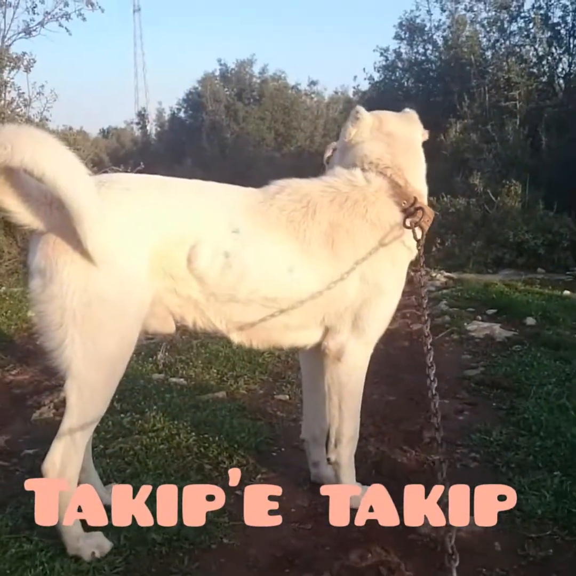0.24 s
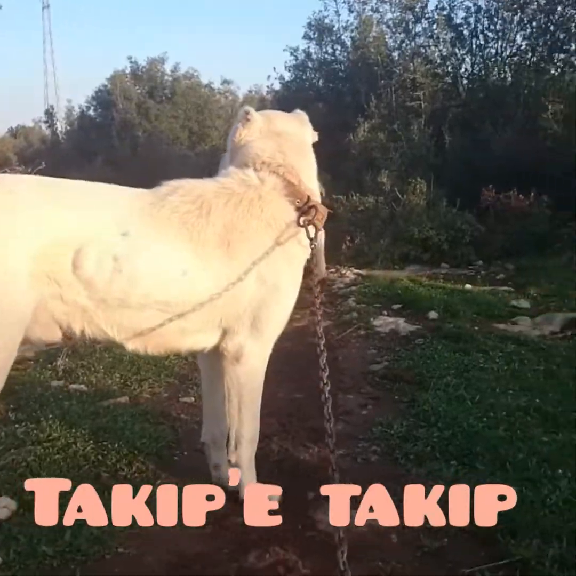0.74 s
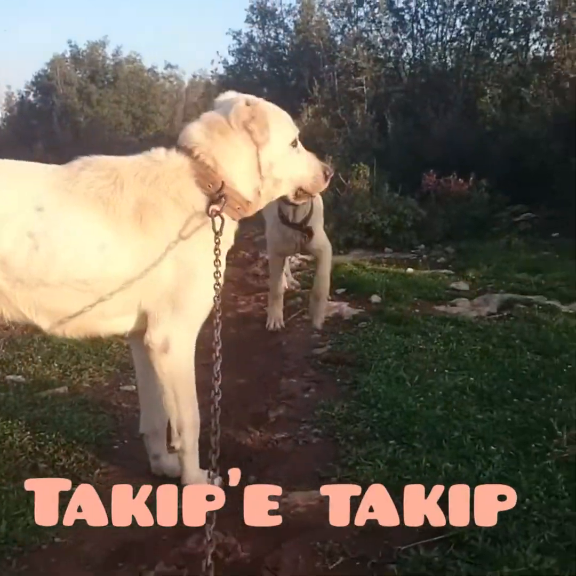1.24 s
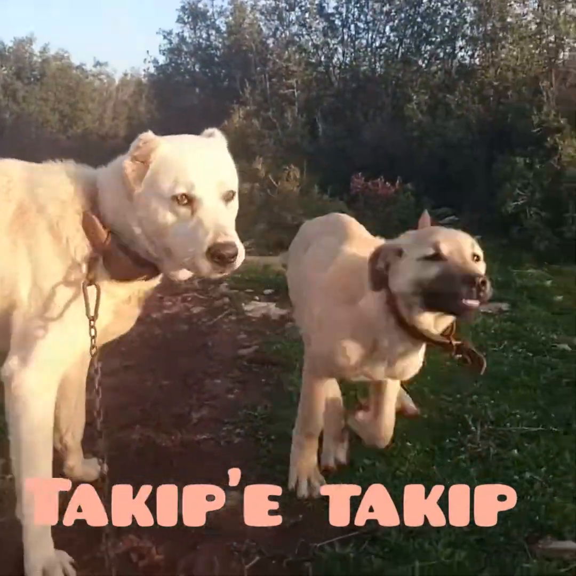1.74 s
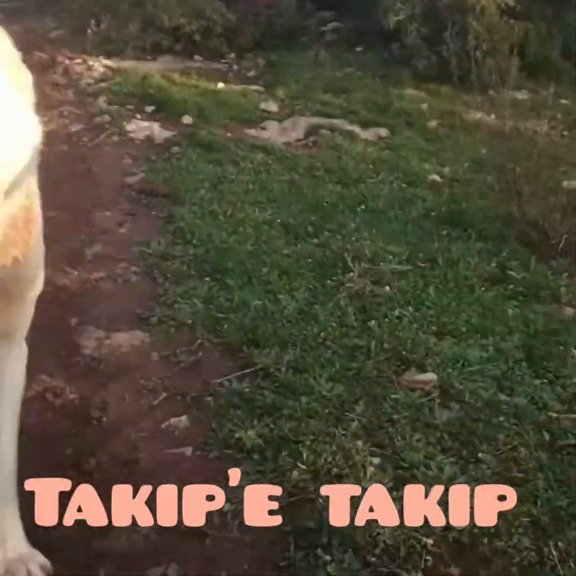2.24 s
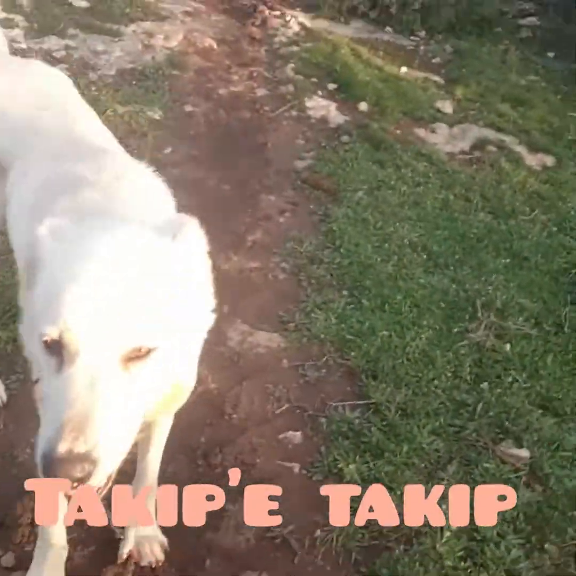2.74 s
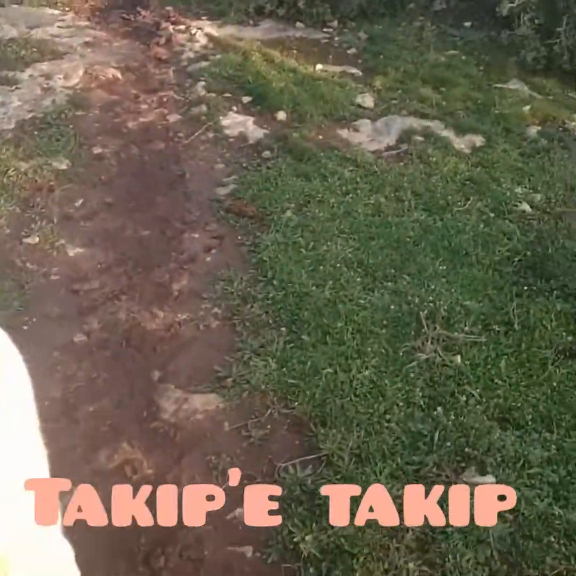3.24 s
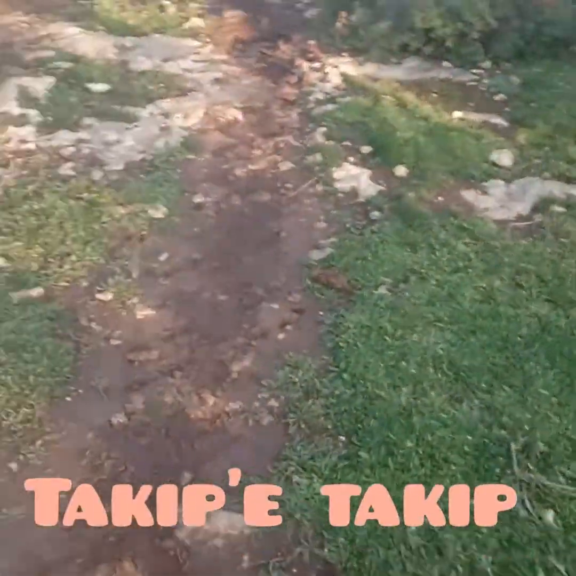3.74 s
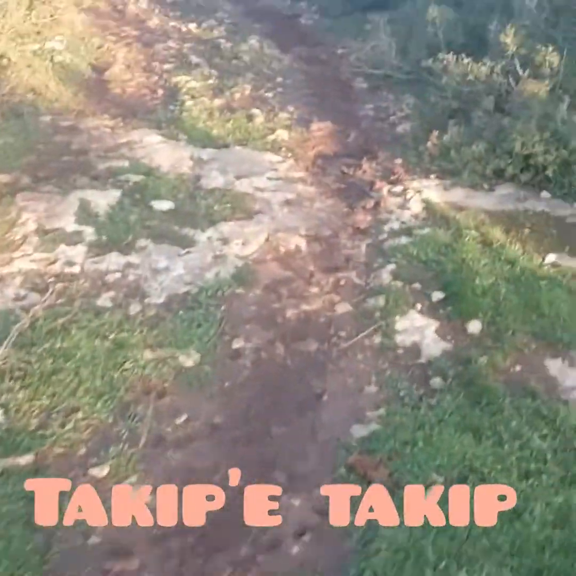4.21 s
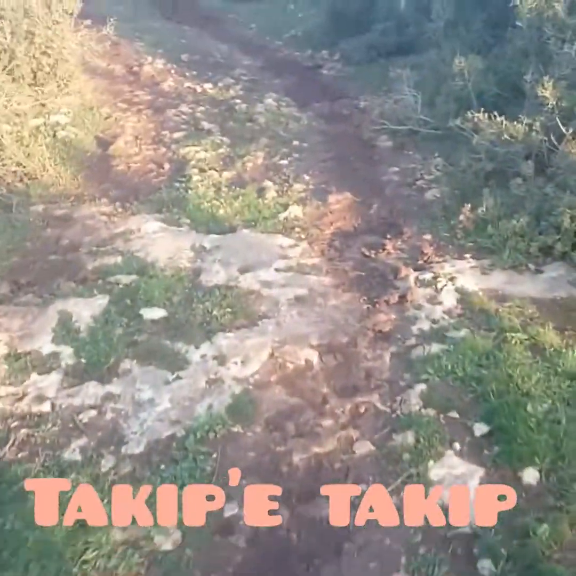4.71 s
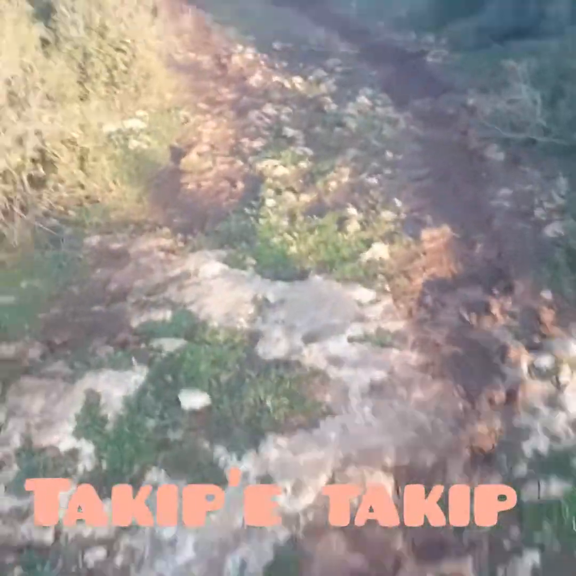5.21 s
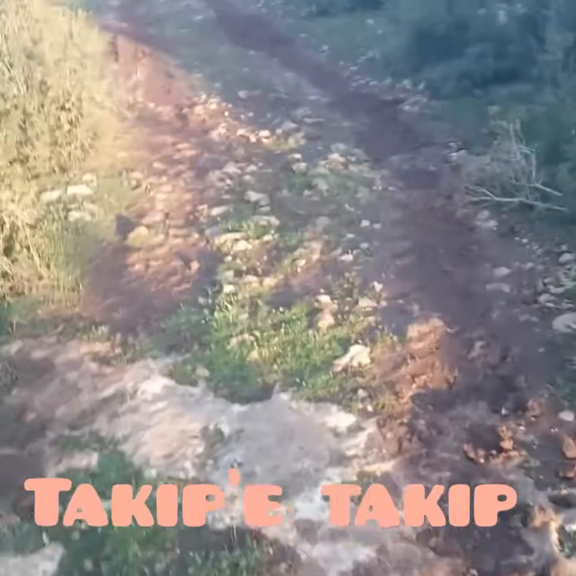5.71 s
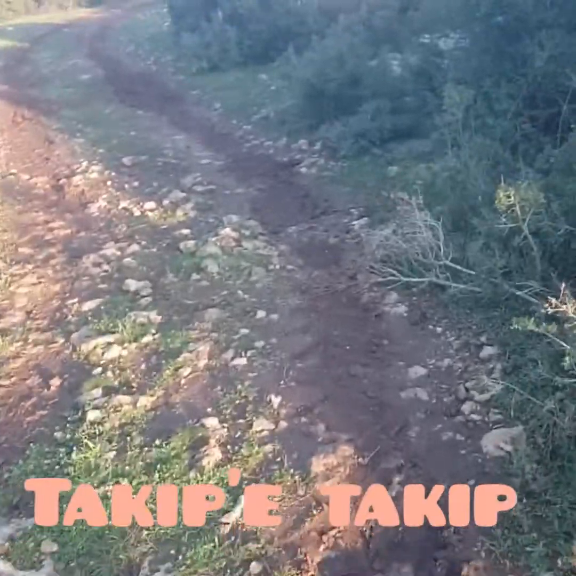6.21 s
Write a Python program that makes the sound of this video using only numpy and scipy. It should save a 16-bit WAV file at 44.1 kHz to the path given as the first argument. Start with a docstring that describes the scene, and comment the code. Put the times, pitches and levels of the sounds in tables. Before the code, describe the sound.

Outdoors on a dirt path, a quiet low rumble and a few soft bumps on the phone come first. After two seconds a chain jerks close by: dry, bright clicks in bursts, then pauses, then harder snaps and blunt clacks, hardest after five seconds. Far traffic stays faint behind. Close handheld phone, dry, no echo.

```python
"""Chained dog passing a phone

Clusters of dry, sharp clicks, as of chain links jerking close by: short snaps that ring the microphone port.
Blunter clacks are damped modes; links shimmer as decaying sines and grind as random slips.
Faint tonal flickers are detuned sine bursts; grit scuffs in tiny grains.
Low bumps and rubs on the phone are swells of tone and filtered noise.
Behind: shaped noise and wavering tones for rumble, far engine, traffic and hiss, and one bird whistle."""
import sys
import numpy as np
from scipy import signal
from scipy.fft import rfft, irfft
from scipy.io import wavfile
from scipy.ndimage import uniform_filter1d

SR = 44100
rng = np.random.default_rng(int(sys.argv[2]) if len(sys.argv) > 2 else 0)


def master_out(mix):
    """Clip the mix to full scale and print it as 16-bit PCM to the path in sys.argv[1]."""
    frames = np.transpose(np.atleast_2d(mix))
    ceiling = np.clip(frames, -1, 1)
    pcm = np.round(ceiling * 32767).astype(np.int16)
    wavfile.write(sys.argv[1], SR, pcm)


N = 284876
TIME = np.arange(N) / SR
NOISE_TOP_HZ, RECORD_TOP_HZ = 15800, 16500


def undb(db):
    """Decibels to gain."""
    return 10 ** (np.asarray(db) / 20)


def unit(x):
    """Scale to rms 1."""
    return x / np.sqrt(np.mean(x ** 2))


def shape(points, hz):
    """Gain at hz of a spectrum given as (hz, db) points, linear in dB over log frequency."""
    point_hz, db = np.transpose(points)
    return undb(np.interp(np.log(hz + 1e-9), np.log(point_hz), db))


def curve(rows):
    """Control curve at every sample from (time_s, value) rows."""
    return np.interp(TIME, *np.transpose(rows))


def swells(rows):
    """Summed Gaussian gains from (crest_s, level_db, sigma_s) rows."""
    return sum(undb(db) * np.exp(-.5 * ((TIME - crest_s) / sigma_s) ** 2) for crest_s, db, sigma_s in rows)


def noise(points):
    """Noise of rms 1, coloured by a spectrum and cut at the top."""
    hz = np.fft.rfftfreq(N, 1 / SR)
    spectrum = rfft(rng.standard_normal(N)) * shape(points, hz)
    return unit(irfft(spectrum * (hz < NOISE_TOP_HZ), N))


def walk(rate_hz):
    """Smooth random curve with about rate_hz turns a second and a spread near 1."""
    k = int(SR / rate_hz)
    steps = np.repeat(rng.standard_normal(N // k + 1), k)
    return 1.288 * uniform_filter1d(uniform_filter1d(steps, k), k)[:N]


def tones(lines, drift, flutter_db):
    """Far tones that waver in pitch and level on their way through the air."""
    out = np.zeros(N)
    for hz, db in lines:
        level = undb(db + flutter_db * walk(6))
        phase = 2 * np.pi * np.cumsum(hz * (1 + drift * walk(9))) / SR
        out += level * np.sqrt(2) * np.sin(phase)
    return out


def ring_of(gain):
    """Minimum-phase impulse response of a magnitude spectrum, by folding the cepstrum."""
    cepstrum = irfft(np.log(gain + 1e-9))
    half = len(cepstrum) // 2
    cepstrum[1:half] *= 2
    cepstrum[half + 1:] = 0
    return irfft(np.exp(rfft(cepstrum)))


def add(out, start_s, sound):
    """Mix a sound in from start_s on."""
    i = max(int(start_s * SR), 0)
    out[i:i + len(sound)] += sound[:N - i]


def contact(t, grit, slip_s):
    """One snap followed by a dying run of tiny slips; energy 1."""
    slips = rng.standard_normal(len(t)) * np.exp(-t / slip_s)
    push = grit * slips / np.linalg.norm(slips)
    push[0] += 1
    return push / np.linalg.norm(push)


def mode_ring(hz, gain, t):
    """Undamped modes summed as sines, their gains scaled to norm 1."""
    return gain / np.linalg.norm(gain) @ np.sin(2 * np.pi * np.outer(hz, t))


# background hiss spectrum: hz, relative_density_db
AIR_SPECTRUM = [(40, -16), (130, -5.5), (200, -10), (320, -14), (900, -30.5), (1400, -27), (2300, -34.5),
                (5000, -32.5), (8000, -36.5), (15000, -38.5)]


def air():
    """Faint steady hiss: shaped noise with a slight level flutter."""
    return noise(AIR_SPECTRUM) * undb(-57 + 0.5 * walk(13.0))


# rumble spectrum: hz, relative_density_db
RUMBLE_SPECTRUM = [(20, -47.5), (34, -37), (46, -8), (63, -2), (85, -19.5), (120, -17), (200, -40),
                   (400, -57.5)]
# rumble level: time_s, level_db
RUMBLE_LEVEL = [(0, -48.5), (.9, -48.5), (2.4, -47.5), (3.2, -53.5), (4.5, -51), (6.46, -50.5)]
# far engine lines: hz, level_re_rumble_noise_db
ENGINE_LINES = [(66, -2), (90, -2.5)]


def rumble():
    """Low noise plus wavering far engine tones on one level curve."""
    engine = tones(ENGINE_LINES, drift=0.0152, flutter_db=2.0)
    return (noise(RUMBLE_SPECTRUM) + engine) * undb(curve(RUMBLE_LEVEL))


# far traffic spectrum: hz, relative_density_db
TRAFFIC_SPECTRUM = [(150, -60), (340, -10), (480, 2), (720, -0.5), (900, -4), (1200, -25), (2000, -21),
                    (4000, -39.5)]
# far traffic level: time_s, level_db
TRAFFIC_LEVEL = [(2.1, -66), (2.6, -57.5), (4.7, -55), (6.46, -57.5)]
# steadier whine: hz, level_re_traffic_db
HUM_LINES = [(481, -8.5)]
# wavering whine: hz, level_re_traffic_db
WHINE_LINES = [(565, -15), (640, -15.5), (745, -13.5)]


def traffic():
    """Far traffic: fluttering shaped noise plus whining tones on one level curve."""
    whine = tones(HUM_LINES, drift=0.0063, flutter_db=3.0) + tones(WHINE_LINES, drift=0.025, flutter_db=5.0)
    roar = noise(TRAFFIC_SPECTRUM) * undb(1.0 * walk(9.1))
    return (roar + whine) * undb(curve(TRAFFIC_LEVEL))


# far tyre passes: crest_s, level_db, sigma_s
TYRE_SWELLS = [(.7, -70, 0.27), (4.32, -62.5, 0.19), (4.88, -62, 0.16)]


def tyres(floor_db=-69):
    """Far tyres: a higher rush of noise, swelling at each pass over a constant floor."""
    rush = noise([(400, -33.5), (900, 14.5), (1400, 8.0), (2000, -16), (4000, -33.0)])
    return rush * undb(1.6 * walk(11)) * (undb(floor_db) + swells(TYRE_SWELLS))


def bird(start_s=1.34, length_s=.16, start_hz=3970, sag_hz_per_s=430, level_db=-74):
    """One thin, far whistle: a sine that swells, falls slightly and stops."""
    t = np.clip(TIME - start_s, 0, length_s)
    phase = 2 * np.pi * np.cumsum(start_hz - sag_hz_per_s * t) / SR
    swell = np.sin(np.pi * (t / length_s) ** 2)
    return undb(level_db) * np.sqrt(2) * np.sin(phase) * swell


# soft low bumps on the phone: crest_s, level_db, sigma_s
BUMPS = [(0.031, -31, 0.0023), (0.339, -41.5, .014), (0.603, -49, 0.036), (1.201, -29.5, 0.012),
         (1.425, -35, 0.011), (1.743, -38, 0.024), (1.914, -26.5, 0.009), (1.963, -38.5, 0.05),
         (2.061, -37, 0.019), (2.329, -34, 0.011), (2.381, -28.5, 0.0069), (2.458, -27.5, 0.0069),
         (2.734, -36, 0.0071), (4.263, -37.5, 0.013), (5.501, -39.5, 0.0084), (5.544, -40, 0.013)]


def bumps(pitch_hz=75.6, rough_db=-6, upper_edge=2.27, size=16384):
    """A few low pressure swings, roughened by band noise that reaches a little higher."""
    out, t = np.zeros(N + size), (np.arange(size) - size // 2) / SR
    band_hz = [pitch_hz / 2, upper_edge * pitch_hz]
    band = signal.butter(3, band_hz, "band", fs=SR, output="sos")
    for crest_s, db, sigma_s in BUMPS:
        swell = np.exp(-.5 * (t / sigma_s) ** 2)
        swing = np.sqrt(2) * np.sin(2 * np.pi * (pitch_hz * t + rng.random()))
        rough = unit(signal.sosfilt(band, rng.standard_normal(size)))
        add(out, crest_s, undb(db) * swell * (swing + undb(rough_db) * rough))
    return out[size // 2:size // 2 + N]  # moves each crest back to crest_s


# rubs on the phone: crest_s, level_db, sigma_s
RUB_SWELLS = [(.06, -51.5, 0.076), (1.21, -54, 0.031), (2.052, -37, 0.0064), (2.35, -48, 0.063),
              (2.095, -41.5, 0.0077), (2.437, -31.5, 0.0098), (2.478, -29.5, 0.0082), (4.905, -42.5, .012),
              (5.515, -50, 0.028)]
# rub spectrum: hz, relative_density_db
RUB_SPECTRUM = [(80, -1), (150, 4.5), (190, -6.5), (230, 1.5), (290, -13.5), (350, -7), (480, -18),
                (800, -37), (2000, -51.5)]


def rubs():
    """Short, low rubs on the phone: noise swells a little higher than the bumps."""
    return swells(RUB_SWELLS) * noise(RUB_SPECTRUM)


# grit scuffing on the path: crest_s, level_db, sigma_s
SCUFF_SWELLS = [(1.803, -58.5, 0.014), (1.853, -59.5, 0.01), (1.99, -56.5, 0.006), (2.15, -63.5, 0.17),
                (4.3, -65, 0.088), (4.385, -60, 0.0078), (4.89, -55, 0.05), (5.51, -57, 0.06)]


def scuffs(rate_hz=1800, spread_db=3.0, size=256, pitch_hz=1750, octaves=0.72, cycles=0.45,
           trickle_db=-71, trickle_from_s=4.0):
    """Random grains of grit, mostly weak: damped sines, each with its own pitch."""
    out, t = np.zeros(N), np.arange(size) / SR
    for start_s in TIME[rng.random(N) < rate_hz / SR]:
        hz = min(pitch_hz * 2 ** (octaves * rng.standard_normal()), SR / 4)
        strength = undb(spread_db * min(rng.exponential(), 4)) * rng.choice([-1, 1])
        add(out, start_s, strength * np.exp(-hz * t / cycles) * np.sin(2 * np.pi * hz * t))
    trickle = undb(trickle_db) * (TIME > trickle_from_s)
    return unit(out) * np.hypot(swells(SCUFF_SWELLS), trickle)


# modes by set, for shimmer and flickers: hz, relative_level_db
MODE_SETS = {"plain": [(3203, -1), (4619, 2), (6751, -4), (7892, -1), (9706, -4), (12280, 0)],
             "bright": [(4700, -1), (6110, 0.5), (7770, -3), (9200, 3), (11530, -1), (12350, -3)],
             "heavy": [(3478, -5), (4296, 5), (5351, 6), (8900, -1), (9500, -4), (11600, -12)]}
# faint tonal flickers: start_s, level_db, gap_s, mode_set
FLICKER_EVENTS = [(1.539, -48.5, .002, "plain"), (1.634, -48.5, 0.0049, "bright"),
                  (1.92, -53.5, .004, "plain"), (1.964, -58, 0.0047, "bright"),
                  (2.005, -46, 0.0043, "bright"), (2.1512, -37.5, 0.0011, "heavy"),
                  (2.19, -49.5, .002, "heavy"), (2.206, -54, .001, "heavy"),
                  (2.231, -57.5, 0.0019, "plain"), (2.732, -54, 0.0032, "plain")]
# 60 dB decay by mode set: t60_s
FLICKER_DECAYS = {"plain": .034, "bright": .032, "heavy": .018}


def flickers(size=8192, bursts=4, detune=.018, scatter_db=3.0, noise_gain=0.43):
    """A few overlapping bursts of slightly detuned decaying sines, each with a short noise."""
    out, noise_power, t = np.zeros(N), np.zeros(N), np.arange(size) / SR
    for start_s, db, gap_s, mode_set in FLICKER_EVENTS:
        fade = undb(db) * np.exp(-np.log(1000) * t / FLICKER_DECAYS[mode_set])
        mode_hz, mode_db = np.transpose(MODE_SETS[mode_set])
        for k in range(bursts):
            hz = mode_hz * (1 + detune * rng.standard_normal(len(mode_hz)))
            gain = undb(mode_db + scatter_db * rng.standard_normal(len(mode_hz)))
            burst_s = start_s + gap_s * (k + rng.uniform(-0.27, 0.23))
            add(out, burst_s, fade * mode_ring(hz, gain, t))
            add(noise_power, burst_s, fade ** 2)
    burst_noise = noise([(1000, -14), (3000, -5), (5000, 3), (12500, -2), (15500, -2)])
    return out + noise_gain * np.sqrt(noise_power) * burst_noise


def shimmer(crest_s=2.1, sigma_s=0.1, level_db=-57, count=130, size=2048, t60_s=0.018, detune=.05):
    """As the chain swings when the dog sets off, many links brush lightly: short detuned mode rings."""
    out, t = np.zeros(N), np.arange(size) / SR
    mode_hz, mode_db = np.concatenate(list(MODE_SETS.values())).T
    fade = np.exp(-np.log(1000) * t / t60_s)
    for offset in rng.uniform(-3.5, 2.5, count):  # in sigmas from the crest
        hz = mode_hz * (1 + detune * rng.standard_normal(len(mode_hz)))
        gain = undb(mode_db) * rng.standard_normal(len(mode_hz))
        add(out, crest_s + offset * sigma_s, np.exp(-.5 * offset ** 2) * fade * mode_ring(hz, gain, t))
    return undb(level_db) * out


# links grinding round the harder jerks: crest_s, level_db, sigma_s
GRIND_SWELLS = [(2.09, -62.5, 0.032), (2.164, -61, .009), (2.215, -66, 0.023), (3.74, -66, .005),
                (4.095, -48.5, 0.0075), (4.265, -45, 0.0072), (4.698, -52, 0.0047), (4.83, -67, 0.026),
                (4.918, -41, .007), (5.361, -29, 0.0042), (5.963, -35.5, 0.0044)]
# grind spectrum: hz, relative_density_db
GRIND_SPECTRUM = [(300, 1.5), (1000, -3), (2000, -4), (3200, -5.5), (5600, -1.5), (7000, -7.5),
                  (10500, 1.5), (13000, -6), (15500, -18)]


def grinds(rate_hz=1800, spread_db=5, size=256):
    """Dense, uneven slips of link on link: random impulses through a colouring filter."""
    strength = undb(spread_db * np.minimum(rng.exponential(size=N), 3))
    slips = (rng.random(N) < rate_hz / SR) * rng.choice([-1, 1], N) * strength
    colour = ring_of(shape(GRIND_SPECTRUM, np.fft.rfftfreq(size, 1 / SR)))
    return swells(GRIND_SWELLS) * unit(signal.fftconvolve(slips, colour)[:N])


# duller clacks: start_s, energy_db, pitch_hz
CLACK_EVENTS = [(2.0838, -33, 4800), (2.31, -30, 1740), (2.319, -28.5, 1810), (2.357, -34, 1590),
                (2.449, -36, 1670), (2.4886, -29.5, 5570), (2.745, -24, 4800), (2.777, -34, 4300),
                (2.8663, -22, 2240), (2.8949, -28, 1840), (3.5902, -21.5, 2200), (3.7282, -25, 2000),
                (4.093, -22, 2200), (4.2647, -6.5, 1380), (4.2659, -9.5, 2450), (4.266, -21, 3180),
                (4.37, -21.5, 2330), (4.285, -27, 3120), (4.912, -14, 4400), (4.912, -14.5, 1150),
                (4.991, -37, 2000), (5.054, -37, 2960), (5.3566, -5, 4300), (5.357, -6.5, 1240),
                (5.365, -1, 1110), (5.3656, -10, 1610), (5.3663, -1, 2500), (5.374, -16, 2590),
                (5.504, -27.5, 2900), (5.5254, -19.5, 2740), (5.541, -39, 3020), (5.592, -33.5, 3180),
                (5.9399, -15.5, 3800), (5.9608, -8, 1920), (5.9613, -11.5, 1160), (6.355, -27, 3640),
                (6.359, -14.5, 2100)]
# treble ring of the microphone port, for clacks and clicks: hz, relative_level_db
PORT_RING = [(1000, -18.5), (3800, -26), (4900, -10), (5600, 2.5), (6100, -5), (6650, -15.5), (8100, -5),
             (8700, -6.5), (9300, -4), (9750, 2.5), (10400, -4), (11000, 0.5), (12000, 0), (12700, 4.5),
             (13100, -3), (13600, -11.5), (15500, -17), (17000, -35)]


def clacks(size=1024, grit=0.67, slip_s=0.0012, damping=.14, thud_db=-18.5, thud_hz=650,
           upper_ratio=1.51, upper_db=-7, upper_top_hz=4600, port_db=-24, port_db_per_db=0.15):
    """Blunt contacts: two heavily damped modes over a low thud; harder ones ring the port more."""
    out, hz, t = np.zeros(N), np.fft.rfftfreq(size, 1 / SR), np.arange(size) / SR

    def mode(f):
        """Resonance peak at f."""
        return 1 / (1 + ((hz - f) / (2 * damping * f)) ** 2) ** 1.66

    thud = undb(thud_db) / (1 + (hz / thud_hz) ** 2)
    for start_s, db, pitch_hz in CLACK_EVENTS:
        upper = undb(upper_db) * mode(upper_ratio * pitch_hz) / np.hypot(1, (hz / upper_top_hz) ** 4)
        port = undb(port_db + port_db_per_db * db) * shape(PORT_RING, hz)
        gain = mode(pitch_hz) + upper + thud + port
        sound = np.convolve(contact(t, grit, slip_s), ring_of(gain))
        add(out, start_s, undb(db) * sound / np.linalg.norm(sound))
    return out


# sharp clicks of the jerking chain: start_s, relative_energy_db, body_re_ring_db
CLICK_EVENTS = [(2.0435, -8, -10), (2.0576, -10, -22), (2.0665, -1, -12.5), (2.0947, -17.5, 0),
                (2.1122, -13.5, -7), (2.123, -20, -16), (2.134, -13, -7.5), (2.182, -29, -19),
                (2.6596, -4.5, -20.5), (2.678, -17, -13), (2.79, -6, -10.5), (2.8046, -15, -14),
                (2.8219, -3, -16), (2.832, -17, -12), (2.8662, 3.5, -23), (2.875, -31, 2),
                (2.8949, -8.5, -3.5), (2.9031, -26, -9), (2.9179, -19.5, -14), (2.931, -36, 3),
                (3.634, -12, -15), (3.7176, -20, -9), (3.7241, -5.5, -23), (3.7282, 1, -13),
                (3.7479, -8, -13), (3.7607, -32, -3), (3.786, -19, -13), (3.799, -17, -9.5),
                (3.9643, -28.5, -9), (4.0767, -20, -17), (4.089, 1, -18.5), (4.0924, -2.5, -14),
                (4.0973, -3, -20), (4.1178, -16.5, -7.5), (4.2529, -16.5, -4), (4.2604, -1.5, -18.5),
                (4.2651, -3.5, -6), (4.2726, -16, -14), (4.357, -36, 3), (4.3703, -11.5, -18),
                (4.3785, -21.5, -7), (4.637, -20.5, -7), (4.6812, -30, -12), (4.694, -5.5, -12.5),
                (4.7007, -4.5, -18), (4.708, -10, -15), (4.7234, -10, -22.5), (4.7517, -10, -19),
                (4.8162, -29, 1), (4.856, -19, -11), (4.898, -4.5, -18), (4.9011, 5, -15.5),
                (4.916, -19, -2), (4.9221, -6, -23.5), (4.926, 3, -20), (4.9318, -10, -23),
                (4.9441, -24.5, -24), (5.1513, -31, -2.5), (5.212, -17.5, -14), (5.2824, -14, -12),
                (5.2975, -23, -8), (5.3295, -30, -4), (5.3603, 4.5, -19), (5.3666, 3, -9),
                (5.3703, 3, -13.5), (5.3809, -7.5, -15.5), (5.3893, -18.5, -6.5), (5.6307, -29, -3),
                (5.9575, -13, -12), (5.9612, -3, -10), (5.9663, 3.5, -14), (5.9738, -11, -11),
                (6.0391, -23.5, -0.5), (6.0876, -13.5, -12), (6.094, -16.5, -11), (6.095, -24, -12),
                (6.3617, -15.5, -9), (6.3759, -14.5, -7), (6.3931, -3, -14.5), (6.4135, -9, -13.5)]
# dull body of a click: hz, relative_level_db
CLICK_BODY = [(100, 4), (250, 3.5), (500, -13.5), (1100, -20.5), (1600, 1), (2150, 3), (3000, -7),
              (4000, -4), (5000, -7), (8000, -43.5)]


def clicks(size=1024, top_db_per_db=0.62, grit=0.52, slip_s=0.00019, tail_db=-27, tail_s=0.00325,
           colour_points=9, colour_db=2.34, ring_octaves=0.013, body_octaves=0.22):
    """Snaps ring the port over a dull body, own colour; weak ones have less top; a faint noise tail follows."""
    out, tail_level = np.zeros(N), np.zeros(N)
    hz, t = np.fft.rfftfreq(size, 1 / SR), np.arange(size) / SR
    top = np.clip((hz - 6000) / 8000, 0, 1)
    colour_hz = np.linspace(0, RECORD_TOP_HZ, colour_points)
    tail_fade = np.exp(-t / tail_s) / np.sqrt(tail_s * SR / 2)  # energy near 1
    for start_s, db, body_db in CLICK_EVENTS:
        colour = np.interp(hz, colour_hz, colour_db * rng.standard_normal(colour_points))
        ring = shape(PORT_RING, hz * 2 ** (ring_octaves * rng.standard_normal()))
        ring = ring * undb(top_db_per_db * db * top + colour)
        body = shape(CLICK_BODY, hz * 2 ** (body_octaves * rng.standard_normal()))
        gain = np.hypot(unit(ring), undb(body_db) * unit(body))
        sound = np.convolve(contact(t, grit, slip_s), ring_of(gain))
        sound = sound / np.linalg.norm(sound) * np.sqrt(np.mean(gain ** 2))  # the body adds energy
        add(out, start_s, undb(db) * sound)
        add(tail_level, start_s, undb(db + tail_db) * tail_fade)
    tail = noise([(400, -11.0), (1500, 1.0), (3200, -4), (5600, -4), (7000, 1.5), (12500, -7), (15500, -25)])
    return out + tail_level * tail


def scene():
    """Open air without echo; one microphone feeds both channels."""
    background = air() + rumble() + traffic() + tyres() + bird()
    handling = bumps() + rubs()
    chain = shimmer() + grinds() + clacks() + clicks()
    return np.tile(background + handling + scuffs() + flickers() + chain, (2, 1))


def record(dry):
    """The phone rounds the sharpest peaks and cuts the top."""
    headroom = 2.5
    rounded = headroom * np.tanh(dry / headroom)
    top_cut = signal.ellip(8, .2, 70, RECORD_TOP_HZ, fs=SR, output="sos")
    return signal.sosfilt(top_cut, rounded)


dry = scene()
out = record(dry)
master_out(out)
```